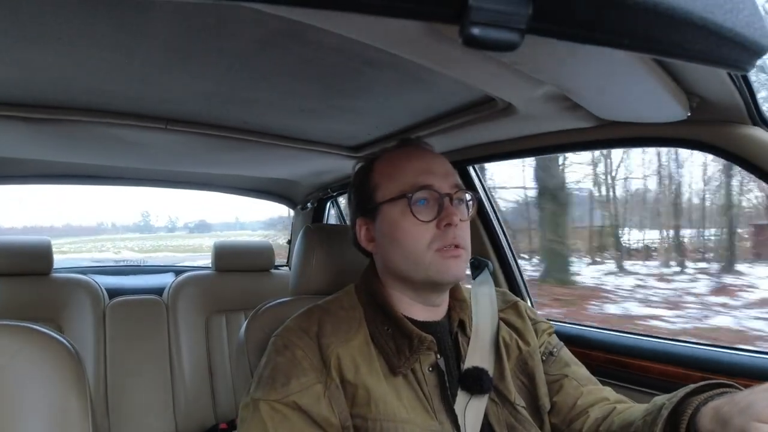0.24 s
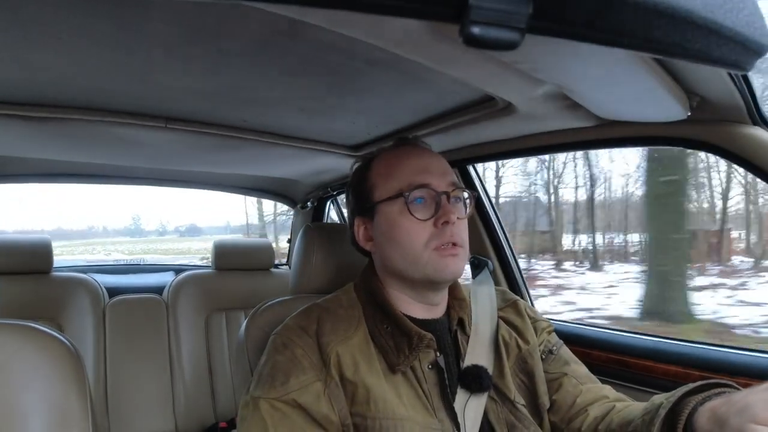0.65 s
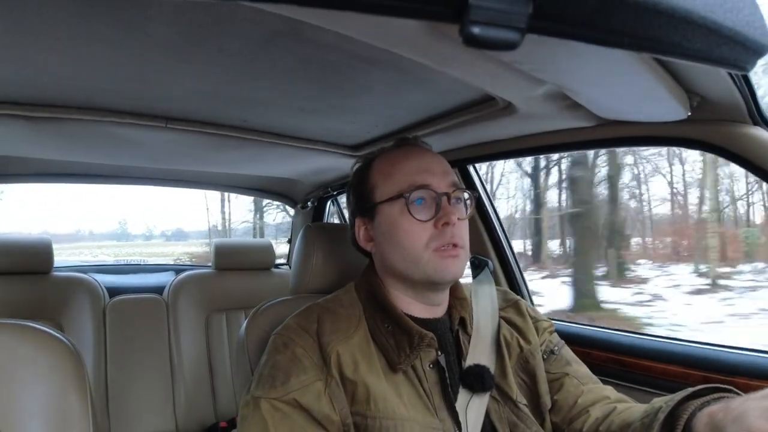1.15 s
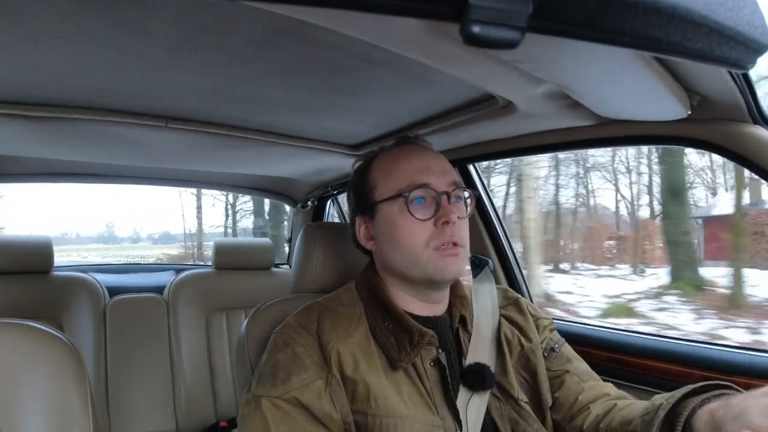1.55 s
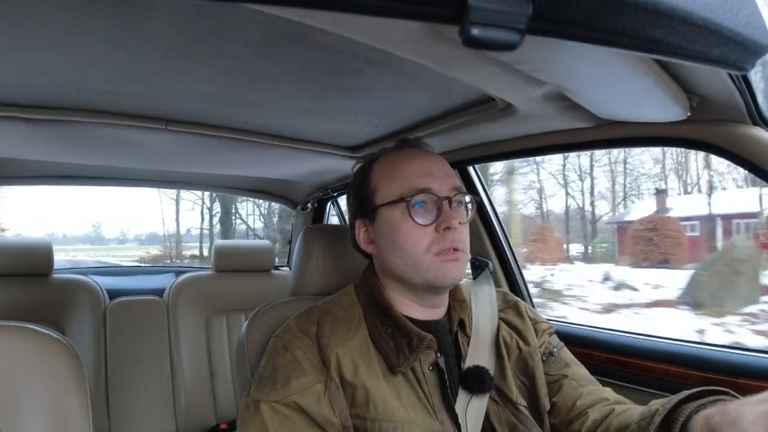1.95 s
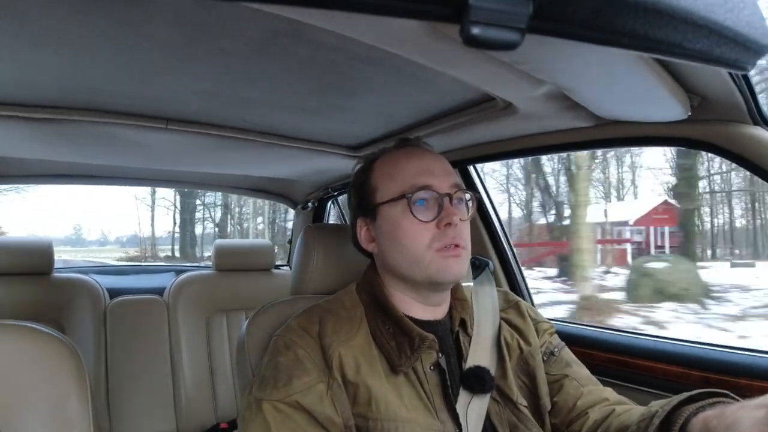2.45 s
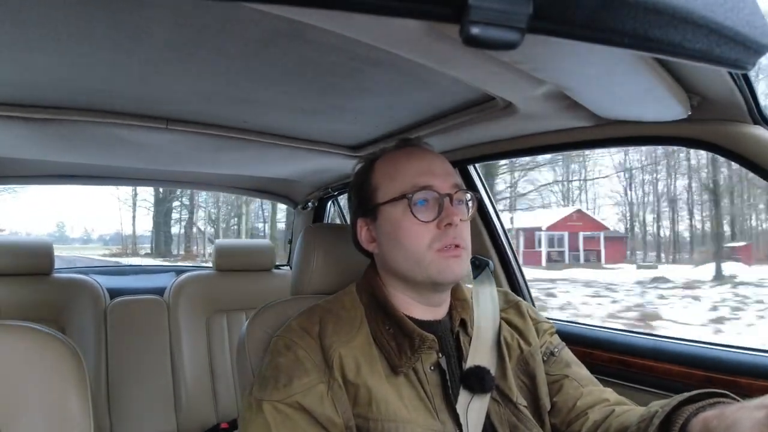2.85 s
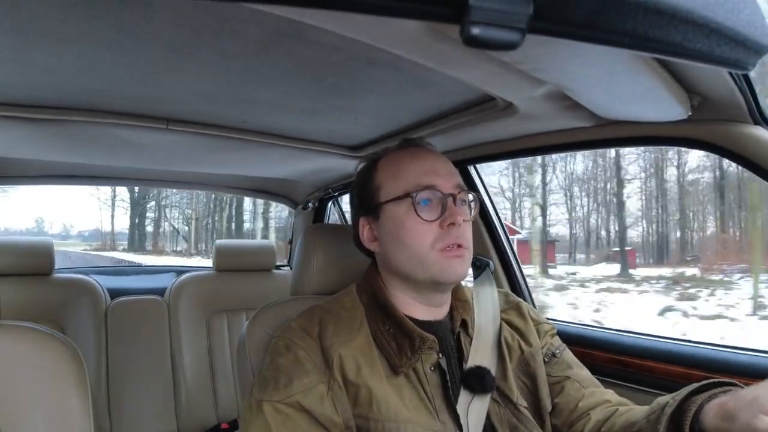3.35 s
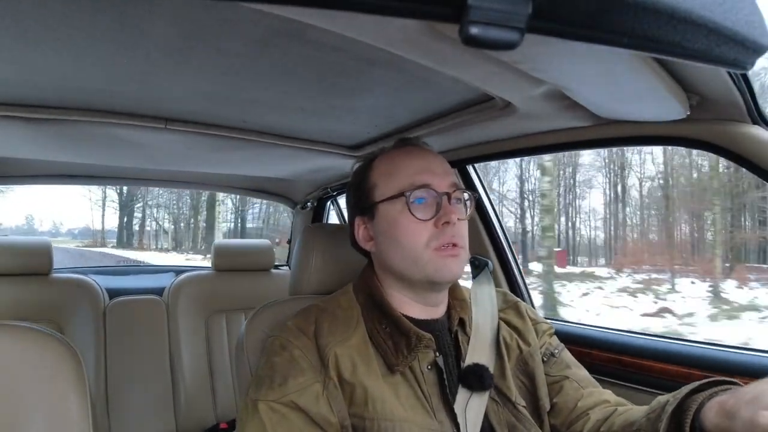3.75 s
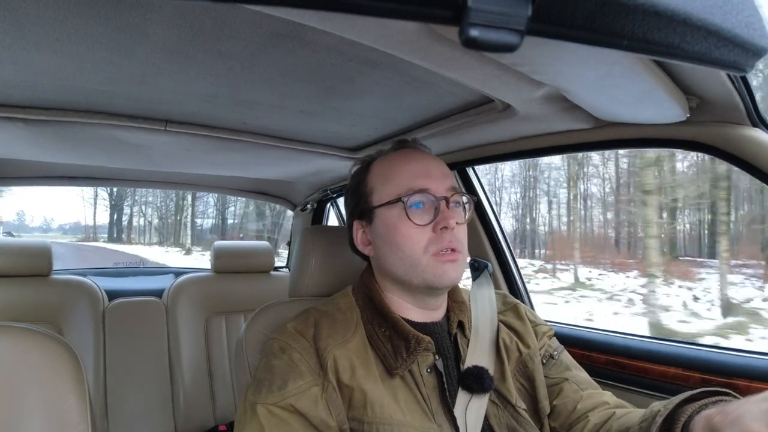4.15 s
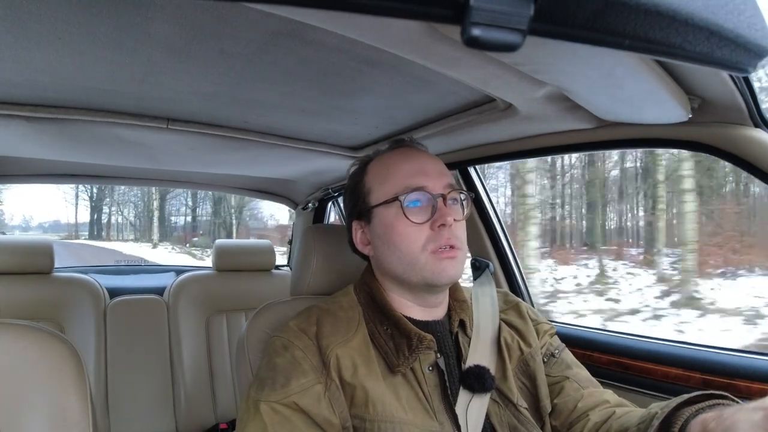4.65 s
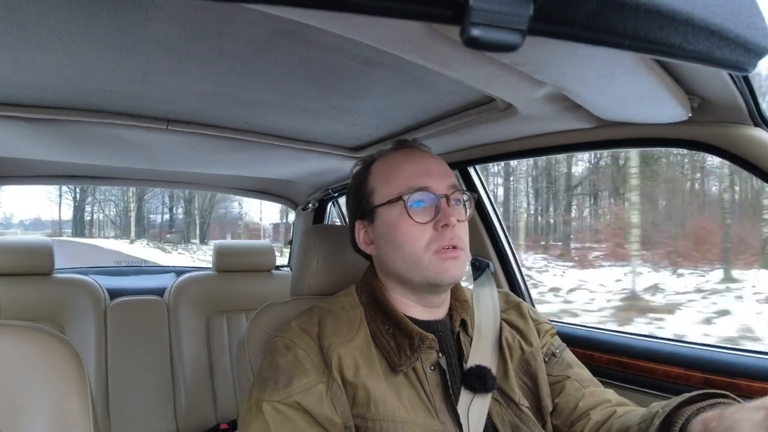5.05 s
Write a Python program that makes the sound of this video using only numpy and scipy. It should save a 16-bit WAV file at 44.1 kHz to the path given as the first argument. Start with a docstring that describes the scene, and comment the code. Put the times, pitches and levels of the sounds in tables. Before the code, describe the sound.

Inside a moving car, low road rumble with dull suspension knocks in bursts, deep cabin booms and small trim ticks.

```python
"""A low tyre rumble and soft hiss, with knocks, deep air booms, ticks, clear notes and small chirps inside a car.
The saloon is on an uneven country road, heard from the driver's waist. Shaped noise makes the tyre sound;
swelling low waves make the cabin air heave and the rear axle thud. Noise snaps and dying tones make
the ticks of grit and trim, single tones make trim and strut ring, and groups of tones make the
suspension knock. A close pair of falling tones makes a loose part chirp."""
import sys
import numpy as np
from scipy import signal
from scipy.fft import rfft, irfft
from scipy.io import wavfile
from scipy.ndimage import uniform_filter1d

SR = 44100
rng = np.random.default_rng(int(sys.argv[2]) if len(sys.argv) > 2 else 0)


def waveform_to_disk(signal):
    """Save audio, clipped to [-1, 1], as 16-bit WAV at the path in sys.argv[1]."""
    frames = np.transpose(np.atleast_2d(signal))
    scaled = np.clip(frames, -1, 1) * 32767
    samples = np.round(scaled).astype(np.int16)
    wavfile.write(sys.argv[1], SR, samples)


N = 233548  # length in samples

# How loud the tyres are over time. Each row: time in seconds, deep rumble level in dB, hiss level in dB.
ROAD_LEVELS = [(0, -21.5, -48.5), (.4, -32.5, -54), (1.2, -36, -53), (1.55, -36.5, -51), (1.9, -32, -50),
               (2.6, -35, -51.5), (3.8, -40.5, -50), (4.1, -35, -49.5), (4.5, -40.5, -51.5),
               (5.3, -42.5, -49)]
# Tone colour of the tyre rumble. Each row: frequency in Hz, relative level in dB.
RUMBLE_COLOUR = [(8.8, -38), (15, 16), (95, -1), (130, -9.5), (182, -12.5), (211, -11.5), (286, -14),
                 (546, -25.5), (840, -31.5), (1100, -33.5), (1430, -67.5), (2420, -120)]
# Tone colour of the tyre hiss. Each row: frequency in Hz, relative level in dB.
HISS_COLOUR = [(290, -37), (500, 0.5), (611, -6), (666, -4), (827, -5), (1100, -21), (1220, -8.5),
               (1510, -14.5), (2300, -23.5), (2890, -24.5), (3430, -32), (8000, -43.5), (12600, -46),
               (13100, -62), (15500, -72.5)]
# Resonances of the car body. Each row: frequency in Hz, width in Hz, relative level in dB.
BODY_HUMS = [(38, 12, -13), (63.4, 31.5, 2.5), (134.8, 12.4, -1), (176, 16.4, -9), (370, 5.1, -38),
             (404.5, 19, -21.5), (612, 18, -25.5)]
DRONE_DB = -36.5  # steady part of the rumble, above the deep part

# Low booms and slow heaves of the cabin air, after bumps and thuds. Each row: time of the deepest trough
# in seconds, peak level in dB, frequency in Hz, frequency it settles to in Hz, swell in seconds,
# fade in seconds.
CABIN_BOOMS = [(0.019, -11, 39.7, 37.8, 0.045, 0.018), (0.115, -10.5, 46, 35.8, 0.03, 0.082),
               (0.281, -22, 62, 66.5, 0.039, 0.026), (1.171, -13.5, 60, 56, 0.017, 0.01),
               (1.219, -19, 43, 42.6, 0.028, 0.063), (1.439, -23.5, 32, 40.2, 0.022, 0.041),
               (1.763, -31, 18, 20.7, 0.029, 0.08), (1.959, -17.5, 74, 62.9, 0.019, 0.088),
               (4.043, -19, 52, 59.6, 0.01, 0.017), (4.128, -11.5, 55.4, 60.5, 0.036, 0.043)]
# Thuds of the rear axle. Each row: time of the trough in seconds, peak level in dB, fade in seconds.
AXLE_THUDS = [(1.393, -11, 0.014), (2.209, -10, 0.014), (4.274, -14, 0.018), (4.312, -17, 0.035)]
THUD_HZ, THUD_SETTLE_HZ, THUD_SWELL_S = 25.6, 26, 0.0092
SETTLE_S = 0.0093  # how quickly booms and thuds drift to their settled pitch
# Tone colour of the wheel patter and trim rattle. Each row: frequency in Hz, relative level in dB.
PATTER_COLOUR = [(40, -42), (75, 29.0), (140, 13.5), (300, -31.0), (1000, -29.0), (3000, -43.5),
                 (6000, -51.5), (14000, -70.0)]

# Ticks of grit and trim. Each row: time in seconds, overall level in dB, then relative to it
# body in dB, sizzle in dB, ring of the trim in dB; centre of the ring in Hz.
TICK_HITS = [(0.001, -43, -5, -10, 1, 2060), (0.004, -43, -11, -23, 2, 4600),
             (0.013, -46, -3, -29, 4, 1850), (0.027, -46, -6, -29, 0, 1800),
             (0.04, -34.5, -10, -7, -12, 1800), (0.071, -47, -20, -4, -2, 5830),
             (0.119, -52, -7, -25, 2, 6100), (0.1385, -16.5, -26.5, -28.5, -21, 2000),
             (0.224, -29.5, -14, -4, -18, 1750), (0.385, -47, -14, -9, -20, 3500),
             (0.463, -42.5, 2, -27, -20, 3580), (0.642, -51.5, 15, -40, 15, 2800),
             (0.646, -56.5, 22.5, -42, 14, 1900), (0.651, -60, 24, -42, 16, 2500),
             (0.655, -68, 24, -46, 12, 1350), (1.021, -48.5, -17, -9, -7, 1730),
             (1.046, -47.5, -1, -12, -12, 6900), (1.148, -58, -3, -25, -5, 5460),
             (1.228, -55, -16, -9, -10, 7200), (1.124, -51, 4, -33, 5.5, 2430),
             (1.267, -41.5, -19, -24, -20, 1700), (1.297, -43.5, -16, -5, -7, 2600),
             (1.32, -37.5, -5, -13, -7, 1730), (1.322, -48, -13, -17, 5, 3160),
             (1.323, -56, -15, -17, 3, 6030), (1.375, -50, -6, -10, -14, 2500),
             (1.4432, -49, 7, -22, -3, 2800), (1.4597, -39.5, 1.5, -14, -15, 2160),
             (1.73, -38, -8, -18, -12, 2520), (1.755, -31, -16, -23, -16, 1550),
             (1.818, -39.5, -8, -18, -10, 3200), (1.902, -61, 20, -23.5, 16, 2100),
             (1.957, -44.5, -2, -17.5, 6.5, 2400), (1.961, -50, -8, -20, 4, 4700),
             (1.985, -57.5, 20.5, -35, 21, 2950), (1.992, -56.5, 21.5, -33, 20.5, 2400),
             (1.998, -60, 21, -33, 14, 1800), (2.134, -50.5, 8, -13, -2, 3400),
             (2.307, -51.5, 0, -2, -1, 1800), (2.3921, -35.5, -4, -19, -5, 2750),
             (2.536, -41.5, -12, -12, -9, 2300), (2.9204, -57, -4, -2, -12, 1700),
             (3.49, -43, -2, -1.5, -7, 8600), (3.99, -43, -12, -17, -10, 3900),
             (4.0072, -45.5, 9, -13, 0, 1770), (4.046, -46, 8, -18, 2, 2500),
             (4.0541, -36.5, 5, -11, -1, 3920), (4.06, -42.5, 14, -16, 0, 1800),
             (4.071, -52, 17.5, -13, -1, 1400), (4.099, -40.5, 6, -13, -3, 3600),
             (4.1131, -34, -5, -12, -2, 2220), (4.262, -50, 7, -20, -2, 4100),
             (4.281, -45, -12, -31, -7, 4100), (4.4308, -55.5, 15, -33, -1, 2980),
             (4.638, -47, -7, -9.5, -7, 1680), (4.799, -32, -12, -26, -3, 4300),
             (4.906, -22.5, -35, -21, -22, 2200), (4.9256, -25, -21, -16, -22, 5400),
             (5.15, -38, -14, -19, -27, 1900), (5.1844, -47, -19, -9, -20, 2600),
             (5.232, -42.5, -3, -17, -13, 4000)]
# Longer, softer scuffs of grit and trim. Each row: start in seconds, overall level in dB,
# then relative to it body in dB, sizzle in dB; centre of the ring in Hz, length in seconds.
SCUFF_HITS = [(0.0, -63, 14, -25, 1900, 0.071), (0.7, -63, 10, -20, 4000, .05),
              (0.84, -52, -3, -13, 5500, 0.044), (0.959, -58, 15, -15, 4500, 0.038),
              (1.47, -51, 9, -20, 3000, 0.025), (1.529, -51, -1, -16, 4500, 0.03),
              (1.672, -43, -6, -14, 5500, 0.056), (1.816, -39, -9, -14, 4500, 0.058),
              (1.964, -50, -2, -13, 4000, .05), (2.089, -50, -2, -14, 4500, 0.056),
              (2.291, -53, 5, -8, 4500, 0.031), (2.545, -56, -6, -4, 5500, 0.021),
              (3.786, -47, -7, -17, 5500, 0.088), (4.014, -49, 7, -20, 2500, 0.047),
              (4.07, -49.5, 14.5, -9, 2490, 0.046), (4.12, -47, 5, -12, 4500, 0.081),
              (4.3, -49, 2, -22, 4500, 0.069), (4.4, -53, 2, -10, 5000, 0.034),
              (5.16, -45, -10, -12, 5500, 0.086)]
# Tones of the trim. Each row: frequency in Hz, relative level in dB, decay time in seconds before scaling.
TRIM_TONES = [(1440, 2.5, 0.21), (1562, 4, 0.058), (1703, -3, 0.11), (1940, -10, 0.023),
              (2180, -10.5, 0.066), (3310, -20, 0.068), (3520, -20, 0.04), (3650, -15.5, 0.035),
              (3700, -12.5, 0.028), (3900, -7, 0.036), (2680, -5.5, 0.044), (3050, -9, 0.047),
              (4640, -9.5, 0.027), (6400, -4, 0.027), (5900, 6.5, 0.025), (7330, -1.5, 0.024),
              (8600, 1, 0.033), (10550, 4.5, 0.039)]
TICK_T60_S, RING_DB_PER_OCTAVE = 0.17, 29
HEAD_S, TAIL_DB, TICK_RISE_S = 0.012, -2, 0.0034  # a short head over a fainter, dying tail
SCUFF_RING_DB, SCUFF_RISE = -16, 0.25  # the rise is a share of the scuff's length
BUZZ_DB, BUZZ_OCTAVES = -9, 0.075  # rough band around the ring; 1 dB down this far from its centre
LUMP_DB = 1.5  # many small resonances, drawn afresh for every tick
EDGE_SHARE, EDGE_DB = 0.59, -5  # the level from 3 to 4 kHz partly follows the body

# Single clear notes of trim and strut, ringing out of a tick or a knock. Each row: time of the peak
# in seconds, level in dB, frequency in Hz, time to die by 60 dB in seconds.
CLEAR_NOTES = [(.006, -43, 1670, .05), (.002, -42, 1700, 0.088), (.003, -48, 2220, 0.1),
               (.018, -44, 1720, .03), (.0255, -42, 1670, .04), (.033, -47, 1730, .04),
               (.047, -47, 1700, .05), (.062, -53, 1800, .06), (.078, -54, 1640, .05),
               (.143, -47, 1760, 0.086), (.1445, -60, 3430, .03), (.227, -47.5, 1720, 0.056),
               (.228, -50, 3290, 0.065), (.647, -44, 2120, 0.03), (.6468, -52, 3110, 0.036),
               (.648, -33, 602, 0.061), (.6495, -38.5, 1540, 0.031), (.654, -44.5, 1286, 0.093),
               (.7, -44, 680, .12), (.72, -47, 644, .08), (.7404, -38, 686, .03), (1.3235, -49, 1670, .04),
               (1.491, -25.5, 240, 0.026), (1.5346, -31.5, 283, 0.097), (1.58, -24.5, 250, 0.037),
               (1.519, -29, 170, .05), (1.615, -32.5, 245, 0.073), (1.647, -30, 235, 0.043),
               (1.6847, -27, 187, 0.043), (1.7408, -24.5, 130, 0.056), (1.9553, -16.5, 270, 0.031),
               (2.1372, -50, 3380, .015), (2.137, -64, 4020, 0.022), (2.398, -43, 1640, .025),
               (2.4, -52, 3460, .04), (4.0568, -22, 560, 0.033), (4.0576, -31, 855, .025),
               (4.066, -36.5, 1290, 0.042), (4.012, -33, 446, 0.062), (4.012, -47, 1740, .03),
               (4.043, -28, 470, .04), (4.064, -18.5, 338, 0.21), (4.07, -22, 400, 0.044),
               (4.0746, -27.5, 680, 0.041), (4.0753, -34, 1010, 0.043), (4.1168, -47, 1550, .035),
               (4.804, -41, 1640, 0.068), (4.805, -47, 1770, 0.059), (4.804, -46, 3780, .03),
               (4.806, -57, 7190, 0.072), (4.8148, -47, 3640, 0.051), (4.9095, -44.5, 6100, 0.028),
               (4.9315, -41.5, 1620, 0.065), (4.931, -55, 5450, 0.055), (4.933, -54, 6400, 0.058)]
NOTE_RISE_S, NOTE_RISE_CYCLES = 0.0012, 0.79
NOTE_ROUGH, NOTE_GRAIN_CYCLES = .3, 5.5

# Suspension knocks. Each row: start in seconds, thump level in dB, centre of the thump in Hz,
# clack level in dB, centre of the clack in Hz.
SUSPENSION_KNOCKS = [(0.124, -9.5, 118, -36, 270), (0.146, -15, 123, -34, 483), (0.2, -33, 139, -31.5, 342),
                     (0.653, -27, 145, -28.5, 608), (1.123, -16, 229, -14.5, 284),
                     (1.14, -15.5, 180, -19.5, 302), (1.187, -15, 169, -28.5, 363),
                     (1.402, -20, 127, -39, 268), (1.491, -15, 186, -38, 250), (1.53, -41, 127, -30, 272),
                     (1.58, -12, 110, -40, 247), (1.64, -17, 214, -43, 275), (1.683, -28, 185, -57, 272),
                     (1.713, -20.5, 205, -34.5, 386), (1.937, -19, 126.4, -35, 252),
                     (1.952, -7.5, 127.7, -19, 265), (1.972, -10.5, 116, -34, 320),
                     (1.988, -13.5, 172, -24.5, 283), (2.034, -33, 130, -25.5, 284),
                     (2.209, -22, 126, -27.5, 300), (4.011, -14.5, 190, -22, 344),
                     (4.034, -5.5, 120, -19.5, 274), (4.055, -3.5, 158.4, -17, 260),
                     (4.066, -16, 126, -22.5, 246), (4.083, -3.5, 126, -19.5, 350),
                     (4.121, -16, 180, -25, 312)]
# Soft thump tones of the chassis. Each row: frequency in Hz, relative level in dB,
# decay time in seconds before damping.
CHASSIS_TONES = [(108, -2, .08), (133, 0, .1), (155, 0, .09), (180, 0, .08), (210, -1, .07)]
# Hard clack tones of the strut. Each row: frequency in Hz, relative level in dB,
# decay time in seconds before damping.
STRUT_TONES = [(239.2, 5, 0.055), (277.3, 1.5, 0.081), (335.2, -5.5, 0.063), (395, -6, 0.068),
               (534, -8.5, 0.059), (615, 1, 0.072), (827, -18.5, 0.093), (1330, -17.5, 0.049)]
THUMP_DAMPING, CLACK_DAMPING = 0.99, 0.9  # decay times are divided by these

# A loose part chirping. Each row: time of the peak in seconds, level in dB, length in seconds.
LOOSE_CHIRPS = [(0.711, -58, 0.0039), (1.445, -59, 0.0058), (1.496, -52.5, 0.0065), (1.543, -56.5, 0.0073),
                (4.061, -38, 0.0034), (4.079, -57, 0.0023), (4.103, -41.5, .005), (4.118, -45, .003),
                (4.13, -50.5, 0.0046), (4.152, -50.5, 0.009), (4.183, -50, 0.0042), (4.204, -59, 0.0053),
                (5.206, -56, .004)]
CHIRP_HZ, CHIRP_SAG_HZ_PER_S = 2643, 14000

TREBLE_LIMIT_HZ = 15800


def amp(db):
    """Turns a level in dB into a gain."""
    return 10 ** (np.asarray(db) / 20)


def evened(x):
    """Scales a signal to an average (rms) level of 1."""
    return x / np.sqrt(np.mean(x ** 2) + 1e-20)


def smoothed(x, size):
    """Smooths a signal twice with a moving average."""
    return uniform_filter1d(uniform_filter1d(x, size), size)


def read(points, hz):
    """Reads a tone colour in dB between its points, on a log-frequency axis."""
    f, value = np.transpose(points)
    return np.interp(np.log(hz + 1), np.log(f + 1), value)


def add(mix, s, sound):
    """Adds a sound that starts at s seconds, cut to the ends of the mix."""
    at = round(s * SR)
    part = mix[max(at, 0):][:len(sound) + min(at, 0)]
    part += sound[max(-at, 0):][:len(part)]


def noise(gain, size, patchy_db):
    """Makes coloured noise from random short-time spectra with drifting patches of level."""
    frames, hz = 4 * N // size + 5, np.fft.rfftfreq(size, 1 / SR)
    a, b, patches = rng.standard_normal((frames, len(hz), 3)).T
    patches = uniform_filter1d(patches, size=10, axis=0)  # across frequency
    patches = evened(uniform_filter1d(patches, size=6, axis=1))  # across time
    spectra = (a + 1j * b) * gain(hz)[:, None] * amp(patchy_db * patches)
    sound = signal.istft(spectra, nperseg=size, noverlap=3 * size // 4)[1]
    return evened(sound[:N])


def ring(modes, weight_db, damping, t, spread):
    """Sums dying tones, each with a small random detune and delay."""
    hz, db, t60 = np.transpose(modes)[:, :, None]
    detune, lag = rng.random((len(modes), 2, 1)).transpose(1, 0, 2)
    turns = hz * (1 + spread * (detune - .5)) * t + 0.057 * lag
    level = amp(db + weight_db(hz) - 60 * t * damping / t60)
    return (level * np.sin(2 * np.pi * turns)).sum(0)


def road():
    """Tyres shake the body into its hums; the hiss comes in through glass and seals."""
    s, *levels = np.transpose(ROAD_LEVELS)
    deep_db, hiss_db = (np.interp(np.arange(N) / SR, s, db) for db in levels)

    def rumble_gain(hz):
        hums = sum(amp(db) ** 2 / (1 + (2 * (hz - f) / w) ** 2) ** 2 for f, w, db in BODY_HUMS)
        return np.sqrt(amp(read(RUMBLE_COLOUR, hz) - 5.5) ** 2 + hums)

    rumble = noise(rumble_gain, size=8192, patchy_db=-0.5)
    deep = signal.sosfiltfilt(signal.butter(3, 108, fs=SR, output="sos"), rumble)
    drone = evened(rumble - deep)
    hiss = noise(lambda hz: amp(read(HISS_COLOUR, hz)), size=512, patchy_db=1.13)
    return amp(deep_db) * evened(deep) + amp(DRONE_DB) * drone + amp(hiss_db) * hiss


def heaves():
    """Each jolt pumps the closed cabin for a few cycles while the wheel patters and the trim rattles."""
    out, jolt = np.zeros(N), np.zeros(N)
    t = np.arange(-SR // 4, SR // 4) / SR  # zero at the trough
    thuds = [(s, db, THUD_HZ, THUD_SETTLE_HZ, THUD_SWELL_S, fade) for s, db, fade in AXLE_THUDS]
    for s, db, hz, settle_hz, swell, fade in CABIN_BOOMS + thuds:
        shape = amp(db) * np.exp(-.5 * (t / np.where(t < 0, swell, fade)) ** 2)
        after = np.maximum(t, 0)
        drift = after - SETTLE_S * (1 - np.exp(-after / SETTLE_S))
        turns = hz * t + (settle_hz - hz) * drift
        add(out, s + t[0], -shape * np.cos(2 * np.pi * turns))
        add(jolt, s + t[0], shape)
    patter = noise(lambda hz: amp(read(PATTER_COLOUR, hz)), size=2048, patchy_db=8.5)
    return out + amp(-12.5) * jolt * patter


def tick(body_db, sizzle_db, ring_db, ring_hz, t60, head_s=HEAD_S, rise_s=TICK_RISE_S):
    """A snap of noise that dies in the padded cabin, and the ring of the trim it strikes."""
    t, hz = np.arange(4096) / SR, np.fft.rfftfreq(4096, 1 / SR)
    edge_db = EDGE_DB + EDGE_SHARE * body_db
    colour = [(400, body_db - 2.5), (1000, body_db), (1600, body_db - 5.5),
              (3200, edge_db - 4.5), (4200, edge_db - 6.5), (6100, -17.5),
              (10500, sizzle_db - 9.5), (12500, sizzle_db - 13.0),
              (13300, 2.1 * sizzle_db - 10.0), (15000, 1.7 * sizzle_db - 14.0)]
    buzz = amp(ring_db + BUZZ_DB - (np.log2((hz + 1) / ring_hz) / BUZZ_OCTAVES) ** 2)
    lumps = evened(amp(LUMP_DB * evened(smoothed(rng.standard_normal(len(hz)), 16))))
    snap = irfft(rfft(rng.standard_normal(4096)) * (amp(read(colour, hz)) * lumps + buzz))
    snap = snap * (np.exp(-(t / head_s) ** 2) + amp(TAIL_DB - 60 * t / t60))

    def weight_db(f):
        near = ring_db - RING_DB_PER_OCTAVE * np.abs(np.log2((f + 1) / ring_hz))
        # high trim tones also ring at least as strongly as the snap's colour
        return np.where(f < 5000, near, np.maximum(near, read(colour, f)))

    sound = snap + ring(TRIM_TONES, weight_db, 0.26 / t60, t, spread=0.0064)
    end_fade = np.cos(np.pi / 2 * t / t[-1])
    return sound * (1 - np.exp(-(t / rise_s) ** 2)) * end_fade


def ticks():
    """Grit and trim make the listed ticks and scuffs, over a random patter of faint scuffs."""
    out = np.zeros(N)
    for s, db, *colour in TICK_HITS:
        add(out, s - .0012, amp(db) * tick(*colour, TICK_T60_S))
    for s, db, body_db, sizzle_db, ring_hz, length in SCUFF_HITS:
        scuff = tick(body_db, sizzle_db, SCUFF_RING_DB, ring_hz, TICK_T60_S,
                     head_s=length, rise_s=SCUFF_RISE * length)
        add(out, s, amp(db) * scuff)
    for when, size, bright in rng.random((30, 3)):
        faint = tick(-1.5, -20 + 9.0 * bright, -7.5, 4000 + 2200 * bright, 0.22,
                     head_s=0.038, rise_s=0.016)
        add(out, when * N / SR, amp(-59 + 6 * size) * faint)
    return out


def clear_notes():
    """A note of trim or strut swells within a few cycles and dies away, with a slightly rough tone."""
    out, t = np.zeros(N), np.arange(-800, 6000) / SR  # zero at the peak
    for s, db, hz, t60 in CLEAR_NOTES:
        rise = np.exp(-(np.minimum(t, 0) / (NOTE_RISE_S + NOTE_RISE_CYCLES / hz)) ** 2)
        fade = amp(db - 60 * np.maximum(t, 0) / t60)
        grain = int(NOTE_GRAIN_CYCLES * SR / hz / 2) + 1  # in samples
        a, b = evened(smoothed(rng.standard_normal((2, len(t))), grain))
        turn = 2 * np.pi * hz * t
        note = (1 + NOTE_ROUGH * a) * np.cos(turn) + NOTE_ROUGH * b * np.sin(turn)
        add(out, s + t[0], rise * fade * note)
    return out


def knocks():
    """A blow thumps the chassis and clacks in the strut, favouring the tones nearest its centres."""
    out, t = np.zeros(N), np.arange(SR // 4) / SR

    def near(centre_hz, db_per_octave):
        return lambda hz: -db_per_octave * np.abs(np.log2(hz / centre_hz))

    # rubber bushings soften the start
    soft, hard = (1 - np.exp(-(t / rise) ** 2) for rise in (.004, .0025))
    for s, thump_db, thump_hz, clack_db, clack_hz in SUSPENSION_KNOCKS:
        thump = ring(CHASSIS_TONES, near(thump_hz, 36.0), THUMP_DAMPING, t, spread=0.088)
        clack = ring(STRUT_TONES, near(clack_hz, 13.6), CLACK_DAMPING, t, spread=0.084)
        add(out, s, -amp(thump_db) * thump * soft - amp(clack_db) * clack * hard)
    return out


def chirps():
    """A small metal part rubs briefly and sings on a close pair of tones that sags in pitch."""
    out, t = np.zeros(N), np.arange(-1200, 1200) / SR  # zero at the peak
    for (s, db, length), lag in zip(LOOSE_CHIRPS, rng.random(len(LOOSE_CHIRPS))):
        turns = CHIRP_HZ * t - CHIRP_SAG_HZ_PER_S * t ** 2 / 2
        pair = np.sin(2 * np.pi * turns) + 0.38 * np.sin(2 * np.pi * (1.045 * turns + lag))
        shape = np.exp(-(t / (length * np.where(t < 0, 0.8, 1.2))) ** 2)
        add(out, s + t[0], amp(db) * pair * shape)
    return out


def scene():
    """Adds all the sources together as one channel."""
    return (road() + heaves() + ticks() + clear_notes() + knocks() + chirps())[None]


def record(dry):
    """Cuts the very highest treble with a steep low-pass filter."""
    low_pass = signal.firwin(2047, TREBLE_LIMIT_HZ, window=("kaiser", 9), fs=SR)
    return signal.oaconvolve(dry, low_pass[None], "same")


dry = scene()
out = record(dry)
waveform_to_disk(out)
```